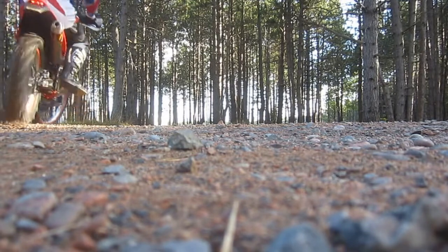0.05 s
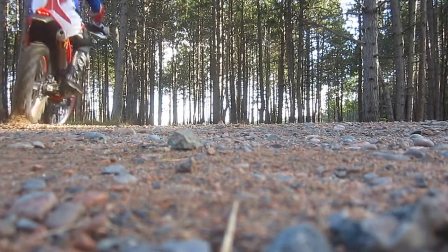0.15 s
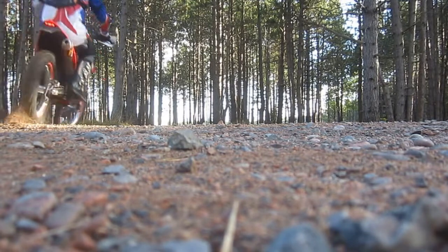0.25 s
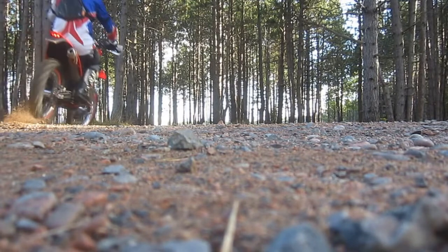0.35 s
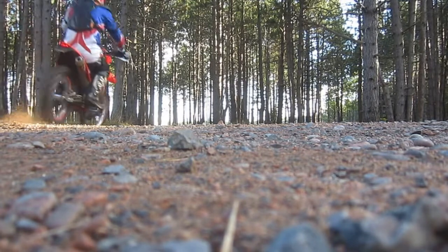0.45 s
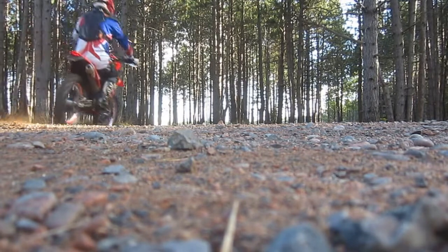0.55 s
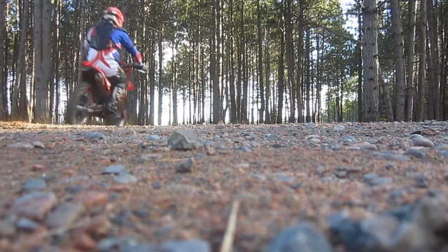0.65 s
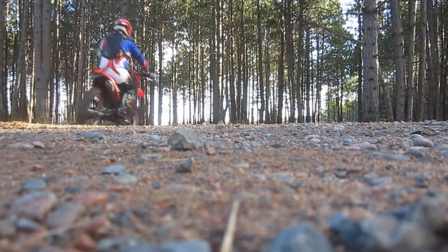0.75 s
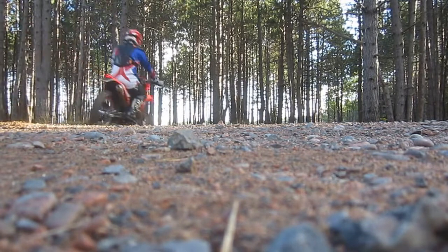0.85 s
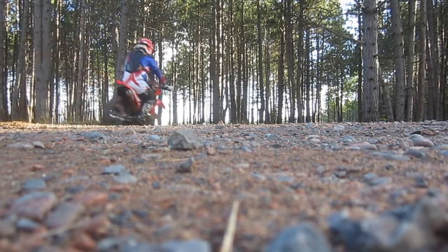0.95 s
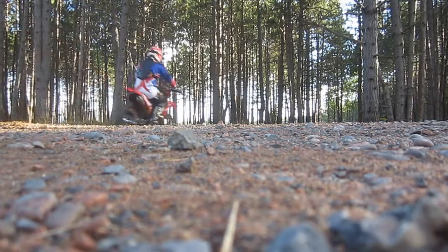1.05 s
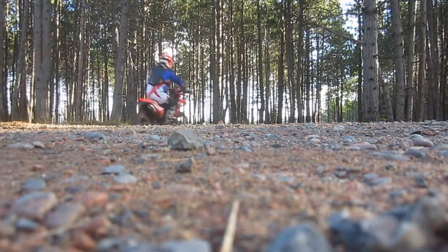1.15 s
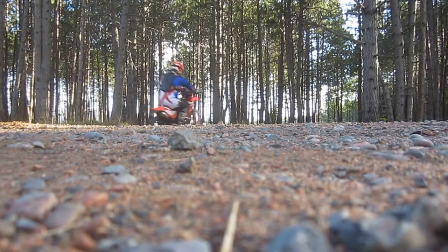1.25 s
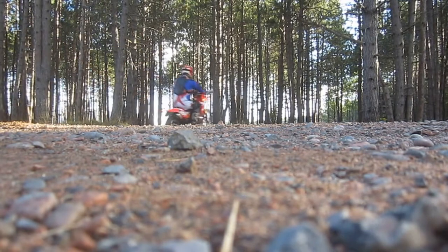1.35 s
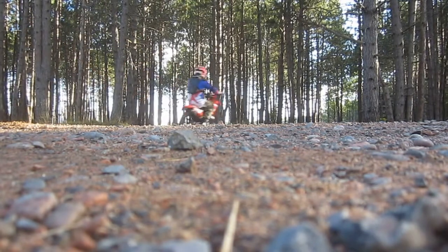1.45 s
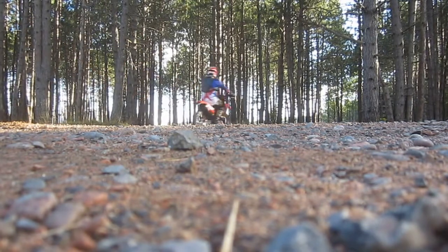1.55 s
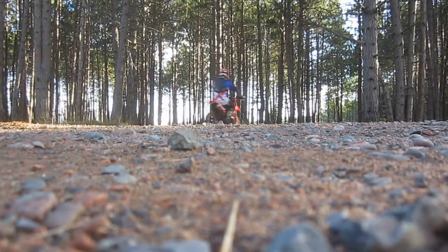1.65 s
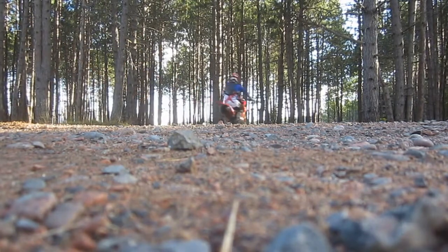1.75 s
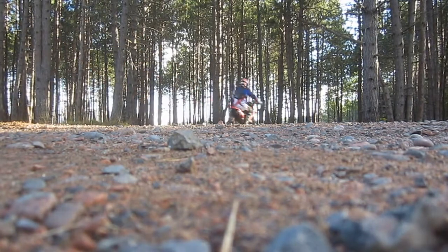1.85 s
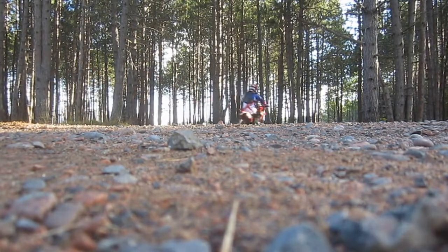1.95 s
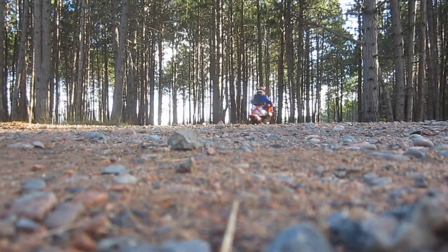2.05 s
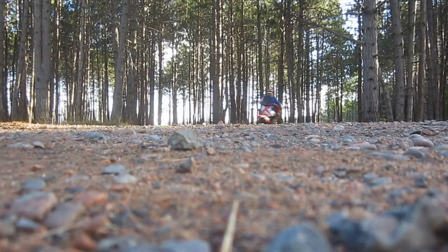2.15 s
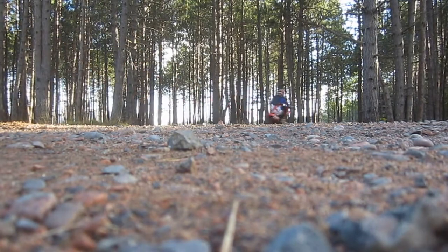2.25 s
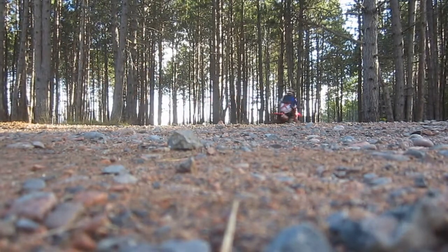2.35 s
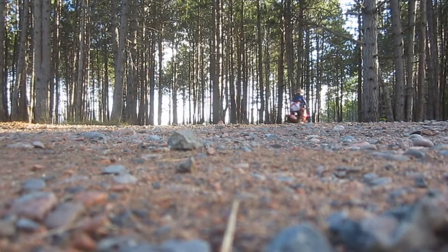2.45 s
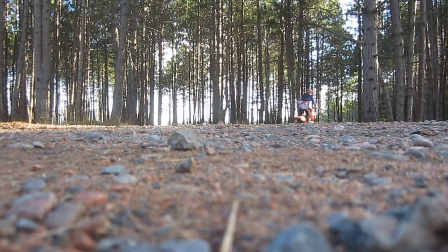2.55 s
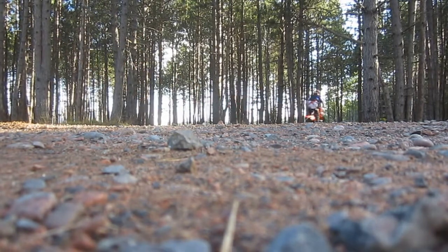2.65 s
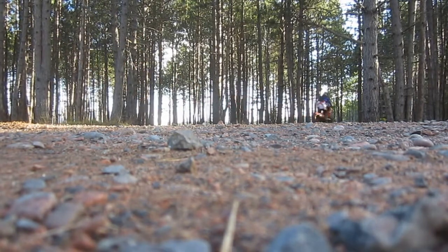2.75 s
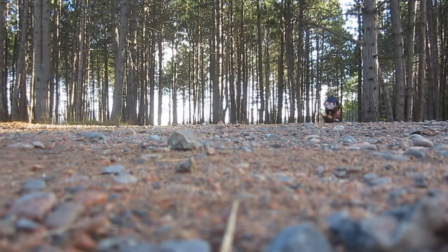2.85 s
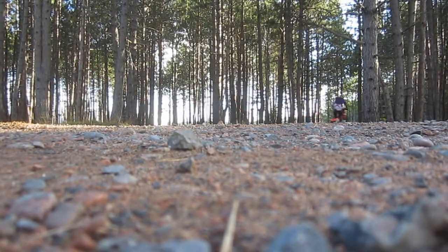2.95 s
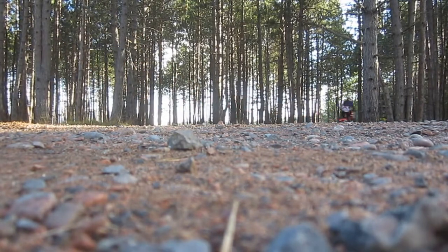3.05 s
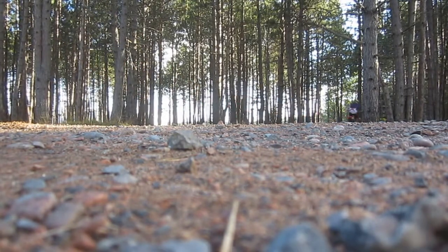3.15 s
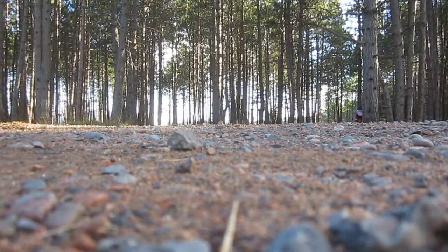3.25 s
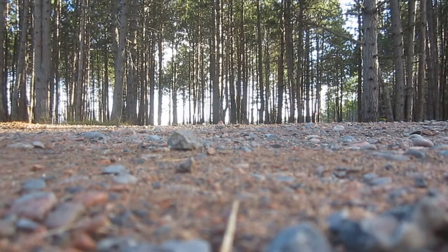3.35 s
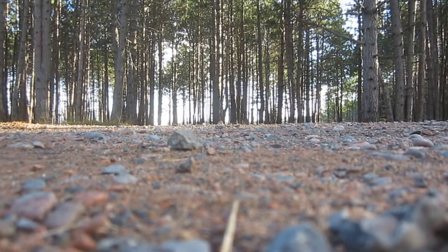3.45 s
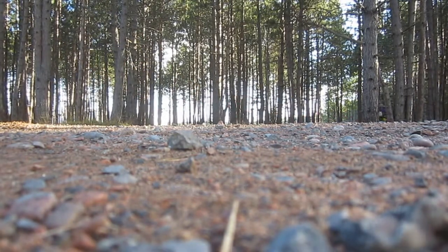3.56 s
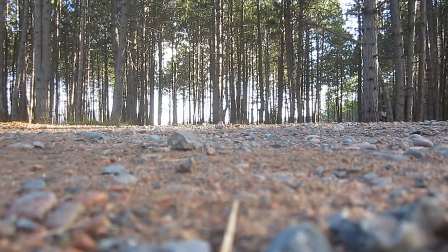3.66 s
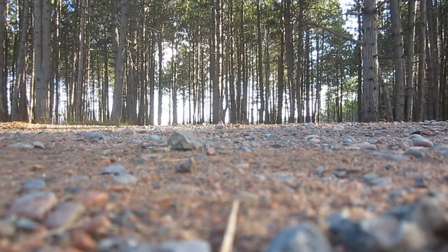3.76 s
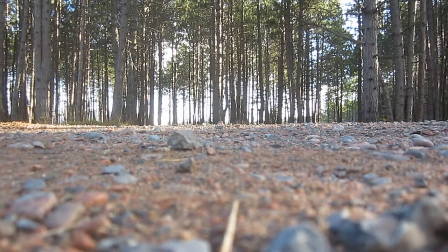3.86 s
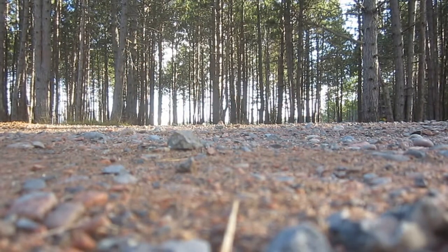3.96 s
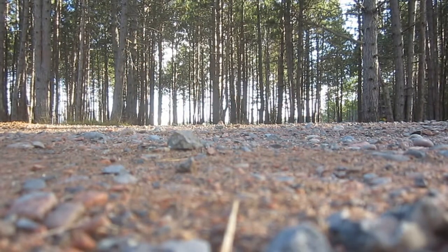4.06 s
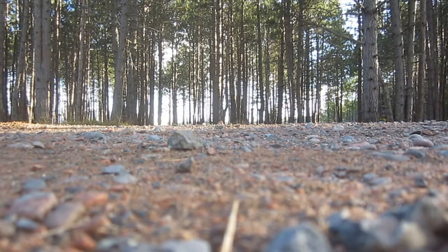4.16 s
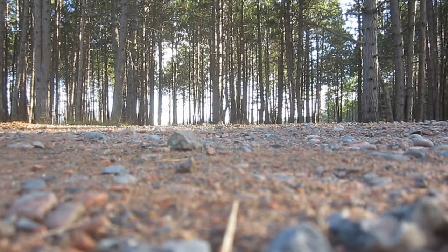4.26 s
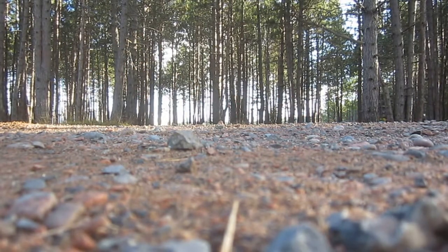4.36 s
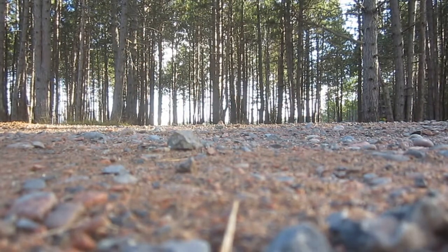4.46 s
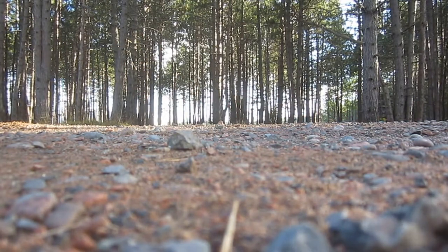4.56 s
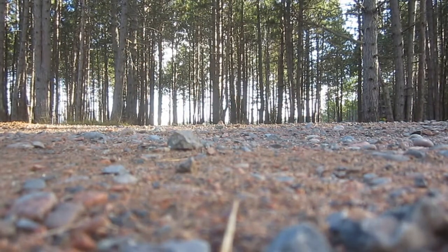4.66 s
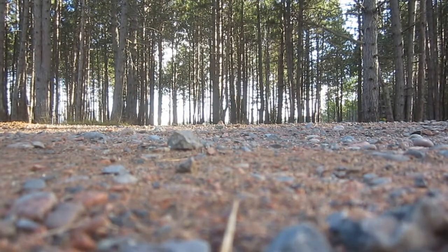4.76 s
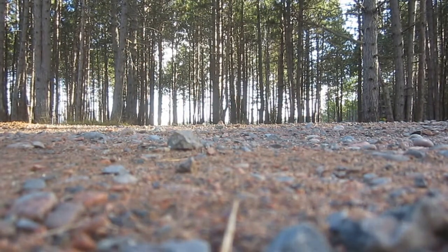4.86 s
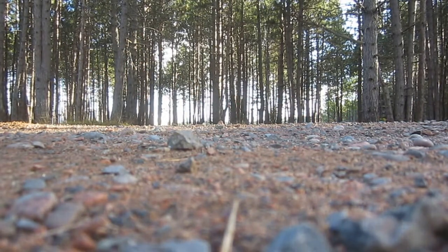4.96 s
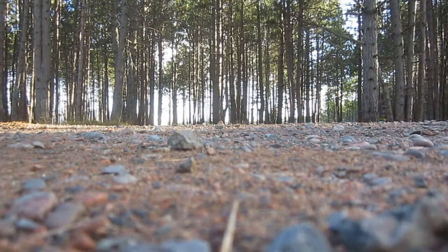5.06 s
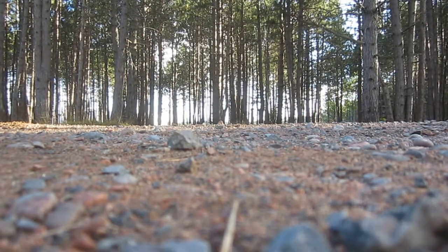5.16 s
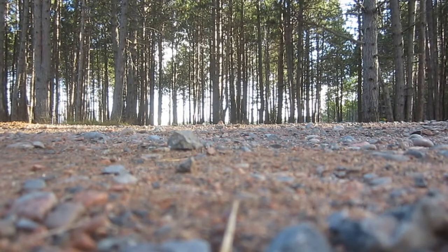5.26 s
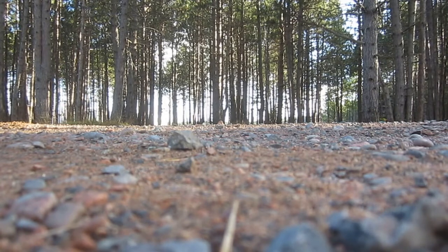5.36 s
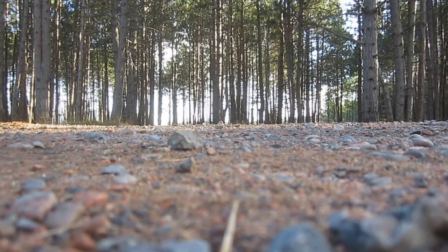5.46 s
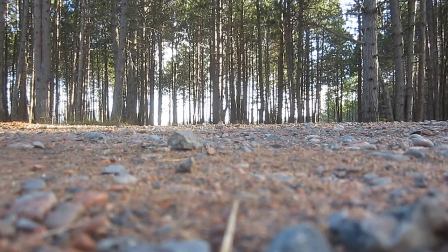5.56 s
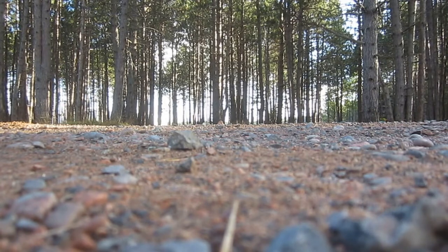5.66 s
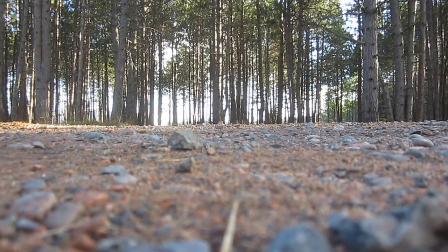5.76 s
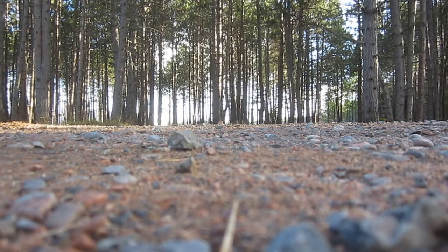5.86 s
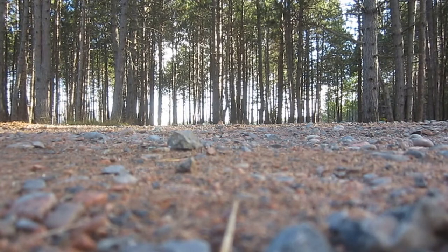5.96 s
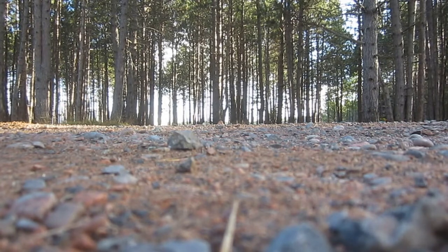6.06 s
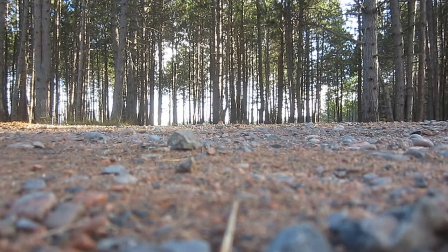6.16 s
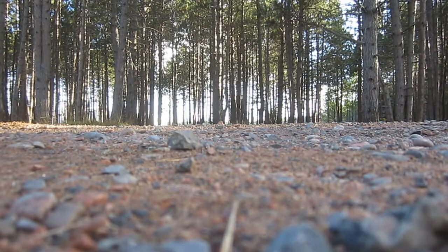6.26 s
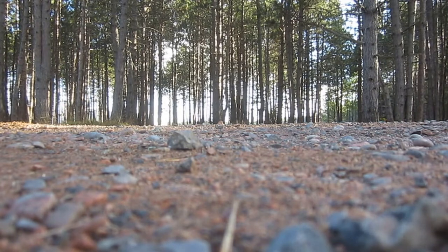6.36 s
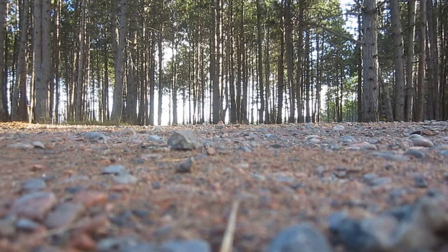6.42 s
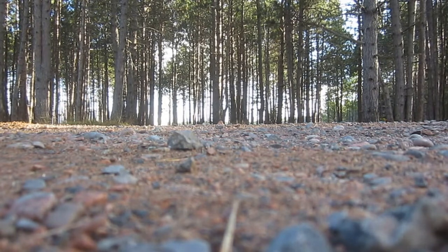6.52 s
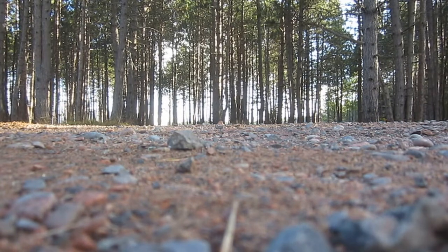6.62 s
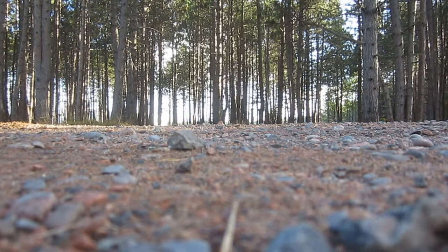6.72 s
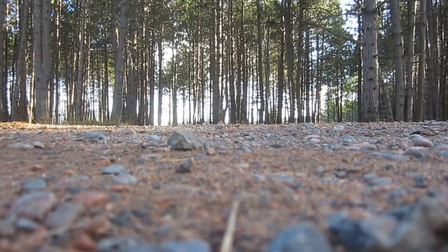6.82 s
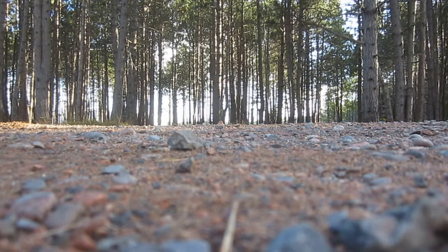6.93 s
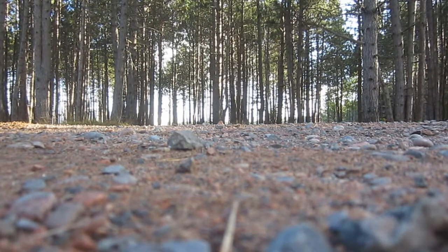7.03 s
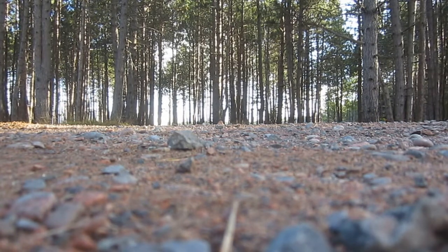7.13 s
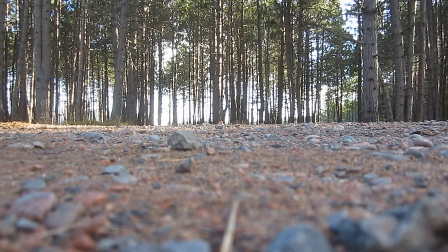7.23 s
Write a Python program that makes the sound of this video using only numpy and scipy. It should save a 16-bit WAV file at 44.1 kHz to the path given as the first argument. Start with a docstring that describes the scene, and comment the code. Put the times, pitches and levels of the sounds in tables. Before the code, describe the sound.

A two-stroke dirt bike accelerates away on a stony forest track in raspy throttle bursts, spraying grit and flicking stones, then fades into distance.

```python
"""On a stony forest track, a two-stroke dirt bike pulls away in bursts of throttle, coasting in between.
Each firing is a click that makes the pipe boom and bark, with noise for the rasp and the jet of gas.
Just after the throttle opens it fires unevenly; lone pops and an intake hum of a few sines join in.
The tyres are shaped noise, rolling and spraying grit; a few stones crack and ring.
The trunks add a fading tail of noise to the bike and the stones."""
import sys
import numpy as np
from scipy import signal
from scipy.fft import rfft, irfft, next_fast_len
from scipy.io import wavfile
from scipy.ndimage import uniform_filter1d, map_coordinates

SR = 44100
rng = np.random.default_rng(int(sys.argv[2]) if len(sys.argv) > 2 else 0)


def wav_record(signal):
    """Record a signal, one row per channel, as 16-bit PCM in the file named by sys.argv[1]."""
    frames = np.transpose(np.atleast_2d(signal))
    bounded = np.clip(frames, -1, 1)
    # unit amplitude maps onto the largest positive 16-bit level
    quanta = np.round(bounded * 32767).astype(np.int16)
    wavfile.write(sys.argv[1], SR, quanta)


N = 321489

# engine speed, with one firing per turn of the crank: (time [s], speed [turns/s])
SPEED = [(0, 46), (.1, 46.6), (.26, 55), (.35, 65.3), (.57, 40), (.8, 41.3), (.9, 45.2), (.97, 53.3),
         (1.06, 58.7), (1.21, 72.4), (1.3, 64.4), (1.41, 55), (1.455, 57.6), (1.54, 69.5), (1.87, 47.5),
         (1.98, 50.8), (2.13, 60.3), (2.29, 56.1), (2.42, 65.4), (2.53, 71.3), (2.66, 72), (2.77, 68.5),
         (2.82, 76), (2.89, 94), (2.94, 114), (3.05, 88), (3.19, 64), (3.3, 93), (3.35, 96.4), (3.45, 91),
         (3.6, 66.5), (3.8, 62), (3.88, 57), (3.985, 79.7), (4.39, 65), (4.81, 68.6), (5.2, 74),
         (5.33, 74.6), (5.52, 88), (5.6, 92), (5.74, 76.5), (6.05, 66.6), (6.8, 69), (6.96, 59), (7.29, 64)]
# tone of the exhaust pipe in the open: (frequency [Hz], level [dB])
PIPE = [(35, -28.5), (70, -13), (115, -8), (170, -6), (230, -3.5), (280, 0.8), (340, -0.6), (400, -4),
        (480, 2.5), (560, -9), (650, -13), (860, -17), (1100, -45), (4000, -83)]
# bursts of throttle: (opens [s], shuts [s], dying away [dB/s], bark over the effort [dB],
# brightening [dB/s], rasp [dB], gas jet [dB], grit [dB], grit growing [dB/s], intake [dB],
# stumbling lasts [s], rough share of misses at first [0-1])
BURSTS = [(.008, 0.336, 600, -4.5, -5, -37, -48, -53, 16, -42.5, 0.18, 0.3),
          (0.811, 1.496, 502, -4, -4.5, -38, -52.5, -51, -11, -43.5, 0.092, 0),
          (1.855, 2.906, 270, -7, 0, -41.5, -58.5, -47.5, 9, -48.5, 0.19, 0.5),
          (3.175, 3.314, 200, -7, 21, -42.5, -61, -47.5, -4, -58, .03, 0),
          (3.641, 3.696, 300, -10, 5, -66, -63, -61, 0, -58, 0.14, .3),
          (3.916, 3.999, 700, -14.5, 62, -48.5, -62, -50.5, -8, -61, .03, 0),
          (4.67, 5.609, 262, -17.5, 28, -61.5, -72, -52, 7.5, -61, 0.51, .55)]
# how hard the engine pulls, one list for each burst: (time [s], level [dB])
EFFORT = [
    [(.01, -31), (.11, -26), (.244, -19), (.33, -22.5)],
    [(.83, -27.5), (.92, -24.5), (1.01, -19), (1.13, -22.5), (1.29, -24.5), (1.48, -25.5), (1.51, -22.5)],
    [(1.86, -31), (1.9, -25), (1.98, -29), (2.1, -22), (2.27, -23.5), (2.38, -20), (2.56, -18.5),
     (2.72, -24.5), (2.89, -19.5)],
    [(3.19, -23.5), (3.298, -20), (3.31, -21)],
    [(3.64, -35), (3.7, -41)],
    [(3.925, -33), (3.937, -21.5), (3.99, -22.5)],
    [(4.68, -42), (4.74, -35.5), (5.06, -29.5), (5.32, -33), (5.45, -35), (5.6, -37)],
]

CROSSOVER_HZ = 345  # boom below, bark above
HIDDEN_S = 4.5  # bursts that open from here on come from behind the trees
FOREST_DB = -21  # scattered sound relative to the direct sound
TOP_HZ = 15720  # nothing is kept from here up

# uneven firing: scatter of strength when pulling cleanly, and added just after opening
EVEN_DB, STUMBLE_DB = .35, 1
JITTER = .00004  # typical timing error in s per dB of that scatter
MISS_DB = -6  # change in strength of a missed firing

PIPE_DELAY = 0.007377  # s from the first port pulse to the main blast
GULP_SHARE = .6  # the intake pulse half a turn ahead of each blast, relative to the first port pulse
SHELL_SHARE = .7  # the silencer's ringing relative to its noise
CHAMBER_HZ, CHAMBER_Q, CHAMBER_GAIN = 228, 4.3, 0.88
CONE_HZ, CONE_Q = 348.5, 5.8

BOOM_DB = -2  # the low note of the pipe relative to the effort
RASP_DRIFT = 0.73  # share of the bark's brightening that the rasp follows

COAST_GRIT_DB = -55.5  # grit under freely rolling tyres
SPRAY_RISE_S, SPRAY_LINGER_S = 0.02, 0.027  # how long grit builds up and hangs on at time zero
SPRAY_SLOWING = 0.65  # per s of riding: both stretch as the bike draws away


def amp(db):
    """Turn decibels into gain."""
    return 10 ** (np.asarray(db) / 20)


def unit(x):
    """Scale to an average (rms) level of 1."""
    return x / np.sqrt(np.mean(x ** 2) + 1e-20)


def steady(x):
    """Hold the rms level near 1 over a few firings, leaving near-silence quiet."""
    size = int(.05 * SR)
    power = uniform_filter1d(uniform_filter1d(x * x, size), size)
    return x / np.sqrt(np.abs(power) + np.mean(x * x) / 1000)


def along(points, hz):
    """Read a value at each frequency from (frequency [Hz], value) points on a log axis."""
    f, v = np.transpose(points)
    return np.interp(np.log(hz + 1), np.log(f + 1), v)


def curves(rows, outside=None):
    """Give one value per sample for each column after the time."""
    s, *cols = np.transpose(rows)
    return [np.interp(np.arange(N) / SR, s, c, outside, outside) for c in cols]


def wobble(rate):
    """Draw a smooth random curve with this many random points a second."""
    knots = rng.standard_normal(int(N * rate / SR) + 4)
    return map_coordinates(knots, [np.arange(N) * rate / SR])


def ring(spectrum, size=8192):
    """Work out how a body with this spectrum answers a single click, with nothing before the click."""
    level_db = along(spectrum, np.fft.rfftfreq(size, 1 / SR))
    # folding the cepstrum (the spectrum of the log spectrum) puts the energy as early as possible
    cepstrum = irfft(np.log(amp(level_db)))
    cepstrum[1:size // 2] *= 2
    cepstrum[size // 2 + 1:] = 0
    return irfft(np.exp(rfft(cepstrum)))


def colour(x, spectrum):
    """Pass x through a body with this spectrum."""
    return signal.fftconvolve(x, ring(spectrum))[:N]


def filtered(x, response):
    """Multiply x by a gain that depends on frequency."""
    size = next_fast_len(N + SR // 2)
    gain = response(np.fft.rfftfreq(size, 1 / SR))
    return irfft(rfft(x, size) * gain, size)[..., :N]


def clicks(times, sizes):
    """Place one-sample clicks at the given times."""
    places = np.clip(np.round(times * SR).astype(int), 0, N - 1)
    return np.bincount(places, sizes, N)


def puffs(pulses, decay, base):
    """Make noise that flares at each pulse and dies down to a steady base flow."""
    flare = signal.lfilter([1], [1, -np.exp(-1 / (decay * SR))], pulses)
    return (unit(flare) + base) * rng.standard_normal(N)


def throttle(burst, attack, linger, fall_db_per_s):
    """Gain that rises as the throttle opens, holds until it shuts plus a linger, then dies away."""
    t = np.arange(N) / SR
    opens, shuts = burst[:2]
    rise = np.clip((t - opens) / attack, 0, 1)
    return rise * amp(-fall_db_per_s * np.maximum(t - shuts - linger, 0))


def push(effort, follows, band_db):
    """Gain of a layer that follows the swings of the effort and changes level in the power band."""
    # speeds between which the engine comes on the pipe: (start [turns/s], full [turns/s])
    power_band = (78, 101.5)
    level, = curves(effort)
    swing_db = level - np.mean(effort, axis=0)[1]
    on_pipe = np.interp(curves(SPEED)[0], power_band, [0, 1])
    return amp(follows * swing_db + band_db * on_pipe)


def forest(x):
    """The trunks scatter a diffuse tail of noise that fades at its own pace in each pitch range."""
    # time to fade by 60 dB: (frequency [Hz], time [s])
    fade_times = [(100, 0.96), (300, 0.45), (1000, 0.51), (5000, 0.093), (14000, 0.027)]
    hz, t, z = signal.stft(rng.standard_normal(SR), SR, nperseg=256)
    fade = amp(-60 * t / along(fade_times, hz)[:, None])
    tail = signal.istft(z * fade, SR, nperseg=256)[1]
    # the echoes build up gradually
    tail *= 1 - np.exp(-np.arange(len(tail)) / (0.0086 * SR))
    return signal.fftconvolve(x, tail / np.linalg.norm(tail))[:N]


def wheelspin():
    """Gain of grit thrown by the rear tyre: it builds in each burst, follows the effort, then settles."""
    spray, t = np.zeros(N), np.arange(N) / SR
    for burst, effort in zip(BURSTS, EFFORT):
        opens, shuts, *_, grit_db, growing, _, _, _ = burst
        stretch = 1 + SPRAY_SLOWING * opens
        swell = throttle(burst, SPRAY_RISE_S * stretch, SPRAY_LINGER_S * stretch, fall_db_per_s=77)
        level_db = grit_db + growing * (np.clip(t, opens, shuts) - (opens + shuts) / 2)
        spray += amp(level_db) * swell * push(effort, follows=0.57, band_db=5)
    return spray


def tyres(grain_db=1.0):
    """Rolling tyres make a dull rush of noise; a digging rear wheel adds a grainy spray of grit."""
    # loudness of tyres and chassis rolling, before its wobble: (time [s], level [dB])
    roll_levels = [(0, -37.5), (.5, -42.5), (1.2, -33.5), (1.8, -46.5), (2.8, -38), (3.6, -42.5),
                   (4.7, -42.5), (5.5, -39.5), (5.9, -41.5), (7.29, -42.5)]
    # tone of the rolling: (frequency [Hz], level [dB])
    ground_tone = [(20, -22), (50, -2), (110, 3), (250, 1.5), (450, 1), (800, 0.5), (1100, -1.5),
                   (1600, -5.5), (2200, -10), (3500, -17.5), (7000, -32), (15000, -70)]
    # tone of the flying grit: (frequency [Hz], level [dB])
    spray_tone = [(1200, -7.5), (2500, 0), (3800, 0), (5400, 1), (7200, -5), (10000, -8), (12500, -15),
                  (15500, -26)]
    roll_gain = amp(curves(roll_levels)[0] + 0.49 * wobble(12))
    roll = roll_gain * unit(colour(rng.standard_normal(N), ground_tone))
    grains = rng.standard_normal(N) * amp(grain_db * wobble(1000))
    grit_gain = np.hypot(amp(COAST_GRIT_DB), wheelspin())
    return roll + grit_gain * unit(colour(grains, spray_tone))


def stones(crack_t60=.05, ring_t60=.02):
    """Each kicked stone strikes with a crack of noise and a brief ringing tone (fading 60 dB in t60 s)."""
    # strikes, with the level before the mix and colouring: (time [s], level [dB], ring [Hz])
    strikes = [(0.491, -40, 3420), (0.511, -36, 2200), (0.5183, -37, 2540), (0.579, -41, 2570),
               (0.6028, -34, 2500), (0.648, -41.5, 1980), (0.7988, -35.5, 3880), (1.672, -40, 3305),
               (1.896, -39.5, 2955)]
    out, t = np.zeros(N + SR), np.arange(SR // 10) / SR
    for s, db, hz in strikes:
        crack = 0.78 * amp(-60 * t / crack_t60) * rng.standard_normal(len(t))
        tone = 0.49 * amp(-60 * t / ring_t60) * np.sin(2 * np.pi * hz * t)
        out[round(s * SR):][:len(t)] += amp(db) * (crack + tone)
    # (frequency [Hz], level [dB])
    stone_tone = [(150, -8), (1000, 14), (3000, 9.5), (7000, 2.0), (12000, -4.0), (16000, -14)]
    return colour(out[:N], stone_tone)


def pops(thump_db=-2, crack_db=-32, crack_t60=.09):
    """Lone hard firings: each thumps through the pipe and spits a short burst of gas noise."""
    # firings, with the level before thump_db or crack_db is added:
    # (time [s], level [dB], bark relative to boom [dB])
    hard_firings = [(.030, -12.5, 0.5), (.051, -20, -5), (.0945, -10, -3), (.697, -36, 4), (.726, -29, 5),
                    (0.754, -18.5, -8), (0.779, -11, 1), (1.81, -30, -14), (1.834, -26, -10),
                    (2.96, -16.5, 2), (3.646, -21, -10), (3.677, -13.5, -21), (3.9034, -9, -40),
                    (4.374, -21, -31), (4.731, -18, -37), (4.760, -20, -30), (4.786, -22, -29),
                    (4.842, -23, -24), (4.886, -21, -21), (4.93, -17.5, -34)]
    # tone of the spitting gas: (frequency [Hz], level [dB])
    spit_tone = [(500, -21), (1500, -13), (3000, -10), (6500, 5), (9000, 10), (12500, 14), (15500, -15)]
    s, db, bark_db = np.transpose(hard_firings)
    thump = -colour(clicks(s, amp(db + thump_db)), PIPE) / np.abs(ring(PIPE)).max()
    dull = filtered(thump, lambda hz: 1 / (1 + (hz / CROSSOVER_HZ) ** 4))
    bark = amp(np.interp(np.arange(N) / SR, s, bark_db))
    t = np.arange(SR // 10) / SR
    spit_hits = clicks(s, amp(db + bark_db + crack_db))
    spit_gain = signal.fftconvolve(spit_hits, amp(-60 * t / crack_t60))[:N]
    spit = spit_gain * unit(colour(rng.standard_normal(N), spit_tone))
    return dull + bark * (thump - dull) + spit


def firings(turns, burst):
    """Time and strength of each firing; they stumble at first, and a miss only pumps unburnt mixture."""
    opens, *_, stumble_s, miss_share = burst
    first_turn = np.interp(opens * SR, np.arange(N), turns)
    times = np.searchsorted(turns, np.arange(first_turn, turns[-1] - 1)) / SR
    stumble = np.clip(1 - ((times - opens) / stumble_s) ** 2, 0, 1)
    scatter_db = EVEN_DB + STUMBLE_DB * stumble
    size, late, luck = rng.standard_normal((600, 3))[:len(times)].T
    missed = (1 + np.tanh(luck)) / 2 < miss_share * stumble
    return times + JITTER * scatter_db * late, amp(scatter_db * size + MISS_DB * missed)


def exhaust_levels(burst, effort):
    """Gains of boom, bark and rasp: all follow the effort, and the upper two drift as the bike turns."""
    # the boom dips briefly: (time [s], half width [s], depth [dB])
    dip_s, dip_width, dip_db = (1.287, 0.056, 6.9)
    # at low revs the boom is thin and the bark stands out: (speed [turns/s], boom level [dB])
    lugging = [(46, -1), (57, 0)]
    opens, shuts, fall_db_per_s, bark_db, brightening, rasp_db = burst[:6]
    t = np.arange(N) / SR
    opening = throttle(burst, attack=0.0034, linger=0, fall_db_per_s=fall_db_per_s)
    pull = amp(curves(effort)[0]) * opening
    drift_db = brightening * (np.clip(t, opens, shuts) - (opens + shuts) / 2)
    dip = dip_db * np.exp(-((t - dip_s) / dip_width) ** 2)
    lug_db = np.interp(curves(SPEED)[0], *np.transpose(lugging))
    boom = pull * amp(BOOM_DB + lug_db - dip)
    bark = pull * amp(bark_db + drift_db - 0.22 * lug_db) * push(effort, follows=0.084, band_db=-1.0)
    rasp = throttle(burst, attack=0.045, linger=0.012, fall_db_per_s=116)
    rasp = rasp * push(effort, follows=0.86, band_db=5.5)
    return boom, bark, rasp * amp(rasp_db + RASP_DRIFT * drift_db)


def exhaust(burst, effort, turns, pipe, lead_share):
    """In one burst, blasts ring the pipe and rasp in the silencer; returns the sound and the blasts."""
    # tone of the silencer's noise: (frequency [Hz], level [dB])
    rasp_tone = [(500, -44.5), (800, -12), (1000, -4.5), (1500, 1.5), (1850, -4.5), (2250, -9),
                 (2550, -5.5), (3000, -16.5), (4000, -19.5), (6500, -41), (15000, -34)]
    # tone of the silencer's ringing: (frequency [Hz], level [dB])
    shell_tone = [(450, -21.5), (680, 1.5), (860, 16.5), (1100, -7), (1500, 5.5), (1850, 1.5),
                  (2250, -12.5), (2550, -9), (3100, -13), (5000, -17), (9000, -84)]
    times, sizes = firings(turns, burst)
    blasts = clicks(times, sizes)
    boom, bark, rasp = exhaust_levels(burst, effort)
    rate = np.interp(times, *np.transpose(SPEED))
    # weaker pulses run ahead of each blast and favour the even harmonics; they fade out at high revs
    apart = sizes * np.clip((100 - rate) / 22, 0, 1) * lead_share
    leads = clicks(times - PIPE_DELAY, apart) + GULP_SHARE * clicks(times - .5 / rate, apart)
    note = -colour(blasts + leads, pipe)
    # the expansion chamber rings on between the blasts
    chamber = signal.iirpeak(CHAMBER_HZ, CHAMBER_Q, SR)
    note = note + CHAMBER_GAIN * signal.lfilter(*chamber, note)
    # the tapered pipe delays the middle of the note, so each blast spreads out in time
    cone = signal.iirpeak(CONE_HZ, CONE_Q, SR)
    note = note - 2 * signal.lfilter(*cone, note)
    low = filtered(note, lambda hz: 1 / (1 + (hz / CROSSOVER_HZ) ** 12))
    ringing = unit(colour(blasts + leads, shell_tone))
    hiss = unit(colour(puffs(blasts, decay=0.014, base=0.29), rasp_tone))
    shell = SHELL_SHARE * ringing + hiss
    sound = boom * steady(low) + bark * steady(note - low) + rasp * steady(shell)
    return sound, blasts * (boom > amp(-70))  # only blasts loud enough to matter


def engine():
    """Bursts sound through the pipe, with a jet of gas at each blast and an intake hum at the crank rate."""
    # tone of the pipe behind the trees: (frequency [Hz], level [dB])
    muffled_pipe = [(40, -21), (75, -8), (145, -2.5), (180, 13.5), (225, -3), (265, 7.5), (310, -26),
                    (370, -14), (440, -7.5), (520, -8), (680, -21), (1000, -16), (4000, -67)]
    # tone of the gas jet: (frequency [Hz], level [dB])
    gas_tone = [(2500, -54), (6500, -10), (8500, -3), (11000, 1), (13000, -2.5), (15500, -13)]
    # the low hum that carries once the bike is far away, before its wobble: (time [s], level [dB])
    far_hum = [(2.7, -72), (3.15, -50), (4.2, -49), (5.2, -49), (5.85, -46.5), (6.4, -50), (7.29, -53)]
    turns = np.cumsum(curves(SPEED)[0]) / SR
    pipe, blasts, jet_gain, intake_gain = np.zeros((4, N))
    for burst, effort in zip(BURSTS, EFFORT):
        opens, *_, jet_db, _, _, intake_db, _, _ = burst
        if opens < HIDDEN_S:
            sound, fired = exhaust(burst, effort, turns, PIPE, lead_share=0.3)
        else:
            sound, fired = exhaust(burst, effort, turns, muffled_pipe, lead_share=0.07)
        pipe, blasts = pipe + sound, blasts + fired
        jet_swell = throttle(burst, attack=0.013, linger=0.018, fall_db_per_s=172)
        jet_gain += amp(jet_db) * jet_swell * push(effort, follows=0.37, band_db=10)
        intake_swell = throttle(burst, attack=0.026, linger=0.018, fall_db_per_s=200)
        intake_gain += amp(intake_db) * intake_swell
    jet = jet_gain * steady(colour(puffs(blasts, decay=0.015, base=0.26), gas_tone))
    crank = 2 * np.pi * turns
    third = .35 * amp(3.5 * wobble(6)) * np.sin(3 * crank)
    fourth = .3 * amp(3.5 * wobble(6)) * np.sin(4 * crank)
    hum = np.sin(crank) + .18 * np.sin(2 * crank) + third + fourth
    hum_gain = np.hypot(intake_gain, amp(curves(far_hum)[0])) * amp(wobble(10))
    return pipe + jet + hum_gain * unit(hum)


def scene():
    """The bike and stones sound among the trees, with the tyres added dry."""
    bike = engine() + pops() + stones()
    return (bike + amp(FOREST_DB) * forest(bike) + tyres())[None]


def record(dry):
    """Remove everything from the band limit up."""
    return filtered(dry, lambda hz: hz < TOP_HZ)


dry = scene()
out = record(dry)
wav_record(out)
```